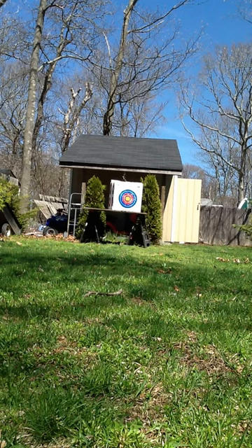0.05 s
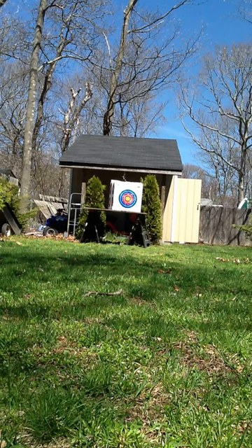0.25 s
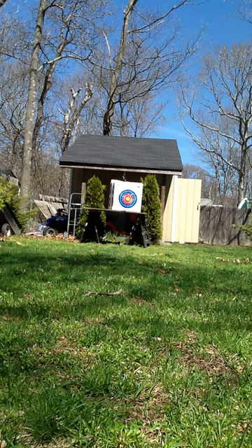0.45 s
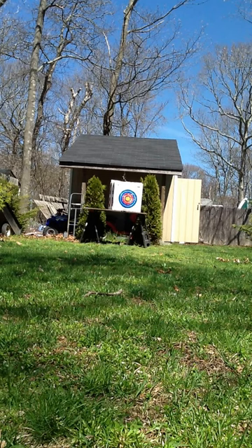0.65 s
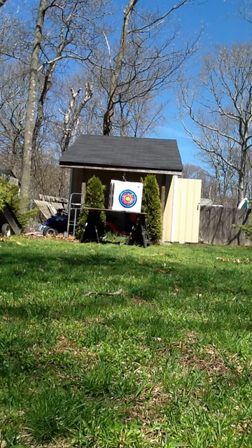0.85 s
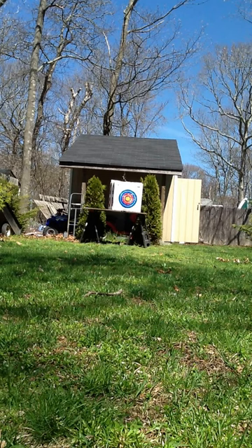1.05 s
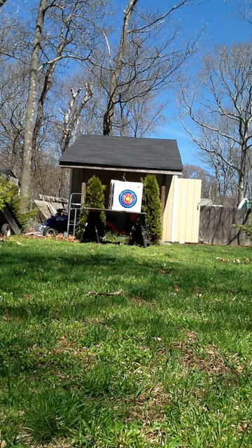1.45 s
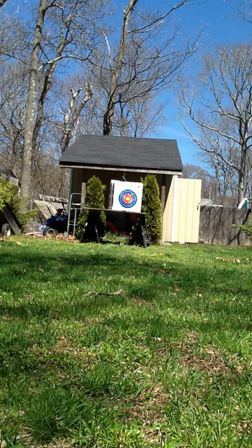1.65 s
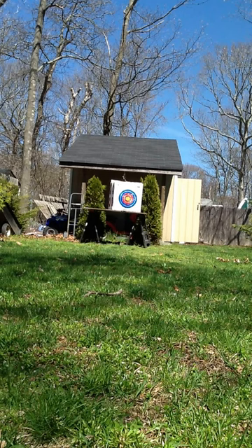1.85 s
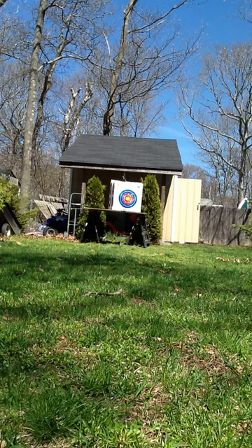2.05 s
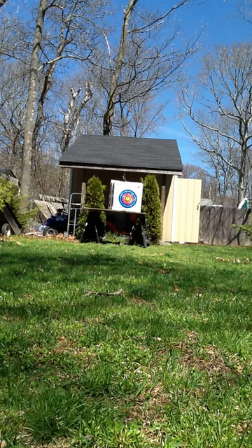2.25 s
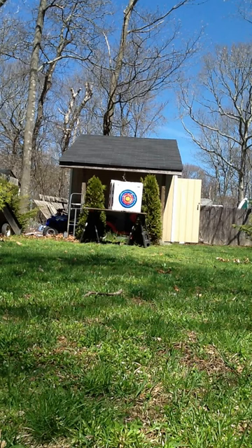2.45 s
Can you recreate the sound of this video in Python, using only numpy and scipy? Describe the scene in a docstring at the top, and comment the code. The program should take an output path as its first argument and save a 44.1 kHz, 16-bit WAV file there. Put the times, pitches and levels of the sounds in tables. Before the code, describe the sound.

An arrow is shot from a bow and cracks into a stuffed target bag.

```python
"""An arrow cracks through the taut cover of a stuffed bag, crunches into the filling and thumps the stand.
A fifth of a second earlier, close by, the release clicks, the string slaps, the limbs ring and the
shaft hisses over the rest. Shed and fence throw the crack back; the back yard's trees add a bright tail
to shot and thump. A sleeve swishes as the bow is lowered and footsteps scuff faintly on grass,
over a bed of distant traffic and thin hiss."""
import sys
import numpy as np
from scipy import signal
from scipy.fft import rfft, irfft, next_fast_len
from scipy.io import wavfile
from scipy.ndimage import map_coordinates

SR = 44100
rng = np.random.default_rng(int(sys.argv[2]) if len(sys.argv) > 2 else 0)


def put_to_file(sound):
    """Save the sound as 16-bit audio at rate SR, in the file named by the first command-line argument."""
    columns = np.atleast_2d(sound).T  # one column per channel
    safe = np.clip(columns, -1, 1)
    whole_steps = np.round(safe * 32767)
    wavfile.write(sys.argv[1], SR, whole_steps.astype(np.int16))


N = 110250
LOOSE_S, HIT_S = .2035, .4197  # cues: the string drives the arrow off, the arrow lands

# EQ of the bed, traffic rumble and airy hiss: f/Hz, relative level/dB
TRAFFIC_EQ = [(15, -76), (25, -53), (48, -41), (65, -23), (102, -13), (120, -6.5), (141, -0.5), (183, -0.5),
              (205, -6.5), (238, -1), (262, -7.5), (447, -14), (1200, -27.5), (1560, -59), (2640, -120)]
AIR_EQ = [(710, -28.5), (1200, -2), (3080, -4.5), (5310, -5.5), (5730, -5.5), (13800, -6.5), (15500, -8.5)]
# decay of the yard's tail: f/Hz, t60/s
YARD_T60 = [(150, .4), (500, 0.33), (1500, 0.71), (4000, .65), (8000, 0.8), (15000, 0.24)]
# slapback off shed and fence: delay/s, send level/dB
WALL_ECHOES = [(.0105, -18), (0.016, -19), (.0265, -20), (.0625, -28)]
# EQ of the tail and of the slapback: f/Hz, level/dB
YARD_EQ = [(100, -13), (250, -8.5), (400, -1), (750, -6), (1500, 1), (2600, -4), (3700, -1), (5000, -6.5),
           (6500, -5), (8500, -3), (15000, -4.5)]
WALL_EQ = [(500, -1), (4000, 0), (6500, -4.5), (9000, -2.5), (11500, -10.5), (15000, -12.5)]
# sleeve swishes and footsteps on grass: t/s, level/dB, rise/s, t60/s
SWISHES = [(.10, -60.5, .012, 0.36), (.735, -62, 0.023, .12), (1.06, -61, 0.023, 0.31),
           (1.853, -46.5, 0.074, 0.31), (1.97, -62.5, 0.038, 1), (2.16, -60, 0.041, 1)]
STEPS = [(1.062, -60, 0.014, 0.19), (1.15, -65.5, 0.036, .4), (1.47, -59, 0.028, 0.17)]
# EQ of the bright swishes and the dull steps: f/Hz, relative level/dB
SWISH_EQ = [(40, -40), (400, -16), (750, -7), (1100, -9.5), (1500, -3.5), (2200, -5), (3500, -1.5),
            (6000, 1), (12400, -2.5), (15500, -7)]
STEP_EQ = [(40, -20.5), (150, -0.5), (500, 0.5), (1000, -8.5), (2500, -4), (5000, -12), (15000, -14)]
# ticks of release, arrow rest and loose bow parts: t/s, burst level/dB, f/Hz, ring level/dB, ring t60/s
CLICKS = [(.1085, -41, 6730, -50, .008), (.1852, -27.5, 9120, -23.5, 0.016),
          (0.1884, -37, 7200, -36.5, .01), (0.2603, -25.5, 11500, -31.5, .004),
          (.2673, -16, 10800, -18.5, 0.0032), (.2737, -32, 5963, -24, .005),
          (.2808, -32.5, 4400, -24.5, 0.0043), (.369, -48, 8000, -55.5, .005),
          (.4015, -53, 6320, -44, 0.0074)]
# ring of limbs and string: f/Hz, level/dB, t60/s
BOW_MODES = [(177, -43, .24), (285.3, -38, .2), (379.1, -39, 0.18), (1090, -43, 0.23), (1410, -42.5, .15),
             (1720, -36, 0.16), (1793, -38, .15), (2073, -38.5, .15), (4360, -32, .03)]
# fader ride of the shaft scraping over the rest: t/s, relative level/dB
SCRAPE_RIDE = [(0.191, -52.5), (0.202, -41.5), (.21, -31), (.223, -33), (0.232, -25.5), (0.244, -27),
               (.256, -34.5), (.275, -35), (0.306, -49), (.34, -59)]
# EQ of click bursts, string slap and shaft scrape: f/Hz, relative level/dB
CLICK_EQ = [(30, -45.5), (300, -26), (1500, -12.5), (4000, -16), (6500, 0.5), (13000, -3), (16000, -7)]
SLAP_EQ = [(40, -40), (130, -10), (300, 1), (550, 0), (800, -6), (1200, 2.5), (1700, -4.5), (2700, -6),
           (4400, 0), (6000, -8.5), (9200, -6.5), (15500, -10)]
SCRAPE_EQ = [(40, -50), (90, -25.5), (150, -6), (320, -3.5), (800, -17), (1050, -4), (1400, -8.5),
             (1730, -3), (2300, -7.5), (3700, -4.5), (8700, -3.5), (13300, -12), (15500, -16.5)]
# thump of bag and stand: f/Hz, level/dB, t60/s, rise/s
BAG_MODES = [(129, -43.5, 0.1, .02), (188.4, -35, 0.096, 0.028), (263, -30.5, .15, .021),
             (306.8, -28, 0.2, .018), (391.3, -33, 0.095, 0.021), (461, -31, 0.11, .012),
             (559, -27, .075, 0.0056), (844, -37, 0.11, 0.0029)]
# snap of the bag's taut cover: f/Hz, level/dB, t60/s
COVER_MODES = [(1580, -21.5, .01), (3220, -11.5, 0.0036), (3663, -4.5, .004), (6180, -11, 0.0027),
               (8670, -14.5, .006), (11250, -20.5, .0035)]
# EQ of the filling's crunch, the bag's thud and the cover's crack: f/Hz, relative level/dB
CRUNCH_EQ = [(40, -42), (150, -23), (300, -11), (850, -9), (1300, -12.5), (2000, -11.5), (3400, -13),
             (5300, -15.5), (8400, -22.5), (13800, -26.5), (15500, -40.5)]
THUD_EQ = [(25, -32.5), (50, -32.5), (110, -12), (220, 5), (480, -1), (900, -10.5), (3000, -47.5)]
CRACK_EQ = [(40, -45), (300, -12.5), (2000, -8), (3600, -2), (5000, -8), (6200, -4.5), (7300, -19.5),
            (8600, 0), (12200, -6.5), (15500, -30.5)]


def amp(db):
    """Decibels to gain."""
    return 10 ** (np.asarray(db) / 20)


def along(points, hz):
    """Read a curve of (f/Hz, value) points on a log frequency axis."""
    f, values = np.transpose(points)
    return np.interp(np.log(hz + 1), np.log(f + 1), values)


def since(start):
    """Seconds since start, zero before it."""
    return np.maximum(np.arange(N) / SR - start, 0)


def wobble(rate):
    """A smooth random modulator, rate knots a second."""
    return map_coordinates(rng.standard_normal(N // 4), [np.arange(N) * rate / SR])


def filtered(x, response):
    """Zero-phase filter; response gives the gain at each frequency."""
    size = next_fast_len(N + SR // 2)
    return irfft(rfft(x, size) * response(np.fft.rfftfreq(size, 1 / SR)), size)[:N]


def equalise(x, eq):
    """Run x through an EQ curve."""
    return filtered(x, lambda hz: amp(along(eq, hz)))


def noise(eq, rough_db=0, rate=500):
    """Coloured noise of rms 1; roughness clumps it into grains, rate a second."""
    grains = rng.standard_normal(N) * (amp(rough_db * wobble(rate)) if rough_db else 1)
    coloured = equalise(grains, eq)
    return coloured / np.sqrt(np.mean(coloured ** 2) + 1e-20)


def envelope(start, rise, t60):
    """A smooth attack from start, then an exponential decay; all in seconds."""
    t = since(start)
    attack = np.sin(np.pi / 2 * np.minimum(t / rise, 1)) ** 2
    return attack * np.exp(-np.log(1000) * np.maximum(t - rise, 0) / t60)


def ring(start, hz, db, t60, rise):
    """One struck mode: a decaying sine of random phase."""
    return amp(db) * envelope(start, rise, t60) * np.sin(2 * np.pi * (hz * since(start) + rng.random()))


def background(traffic_db=-56, air_db=-64):
    """The bed: distant traffic wavers slightly under a thin, steady hiss."""
    traffic = amp(traffic_db + .64 * wobble(8.22)) * noise(TRAFFIC_EQ)
    air = amp(air_db - .04 * wobble(5)) * noise(AIR_EQ)
    return traffic + air


def yard(x):
    """Trees and fences scatter sound into a tail; upper mids and treble linger, the very top dies first."""
    hz, t, spectrum = signal.stft(rng.standard_normal(SR), SR, nperseg=256)
    decay = np.exp(-np.log(1000) * t / along(YARD_T60, hz)[:, None])
    tail = signal.istft(spectrum * decay, SR, nperseg=256)[1]
    tail *= envelope(0, rise=.015, t60=100)[:len(tail)]  # soften the onset
    wet = signal.fftconvolve(x, tail / np.linalg.norm(tail))[:N]
    return equalise(wet, YARD_EQ)


def walls(x):
    """Shed and fence throw back short, duller echoes."""
    echoes = sum(amp(db) * np.roll(x, round(delay * SR)) for delay, db in WALL_ECHOES)
    return equalise(echoes, WALL_EQ)


def sleeve_and_steps():
    """Soft foley: bright swishes of a rubbing sleeve and dull scuffs of footsteps on grass."""
    def swells(rows):
        return sum(amp(db) * envelope(start, rise, t60) for start, db, rise, t60 in rows)
    return swells(SWISHES) * noise(SWISH_EQ) + swells(STEPS) * noise(STEP_EQ)


def clicks(rise_s=.0006):
    """Small hard parts of the bow tick: a bright burst and a short ring each."""
    ticks = np.zeros(N)
    for start, burst_db, hz, ring_db, t60 in CLICKS:
        ticks += ring(start, hz, ring_db, t60, rise_s)
        ticks += amp(burst_db) * envelope(start, rise_s, t60=.0093) * noise(CLICK_EQ)
    return ticks


def bow(rise_s=.0064, limb_lag_s=.0038):
    """The string slaps, the limbs ring and the shaft scrapes over the rest."""
    slap = amp(-22) * envelope(LOOSE_S, rise_s, t60=.029) * noise(SLAP_EQ)
    limbs = sum(ring(LOOSE_S + limb_lag_s, hz, db, t60, rise_s) for hz, db, t60 in BOW_MODES)
    times, ride_db = np.transpose(SCRAPE_RIDE)
    friction = np.interp(since(0), times, amp(ride_db), left=0, right=0)
    scrape = amp(-1.5) * friction * noise(SCRAPE_EQ, rough_db=2.5, rate=700)
    return slap + limbs + scrape


def bag_thump():
    """The body of the hit: the shaft tears into the filling and shoves the bag on its stand."""
    grit = noise(CRUNCH_EQ, rough_db=2.5, rate=400)
    crunch = amp(-24.5) * envelope(HIT_S, rise=.003, t60=.16) * grit
    thump = sum(ring(HIT_S, *mode) for mode in BAG_MODES)
    thud = amp(-28) * envelope(HIT_S, rise=.013, t60=.17) * noise(THUD_EQ)
    return crunch + thump + thud


def cover_crack(rise_s=.00058):
    """The transient of the hit: the point punctures the taut cover, which rings for milliseconds."""
    snap = sum(ring(HIT_S, hz, db, t60, rise_s) for hz, db, t60 in COVER_MODES)
    burst = amp(-10.5) * envelope(HIT_S, rise_s, t60=.006) * noise(CRACK_EQ)
    return snap + burst


def scene(bow_send_db=-18, bag_send_db=-10.5):
    """Mono mix: the near bow is fairly dry, the far thump is wetter, and the crack gets slapback only."""
    shot = clicks() + bow()
    thump = bag_thump()
    tail = amp(bow_send_db) * yard(shot) + amp(bag_send_db) * yard(thump)
    crack = cover_crack()
    return (shot + crack + walls(crack) + thump + tail + sleeve_and_steps() + background())[None]


def record(dry, top_hz=15500, fade_hz=400):
    """A steep high cut on the master."""
    return filtered(dry[0], lambda hz: np.clip((top_hz - hz) / fade_hz + .5, 0, 1))[None]


dry = scene()
out = record(dry)
put_to_file(out)
```